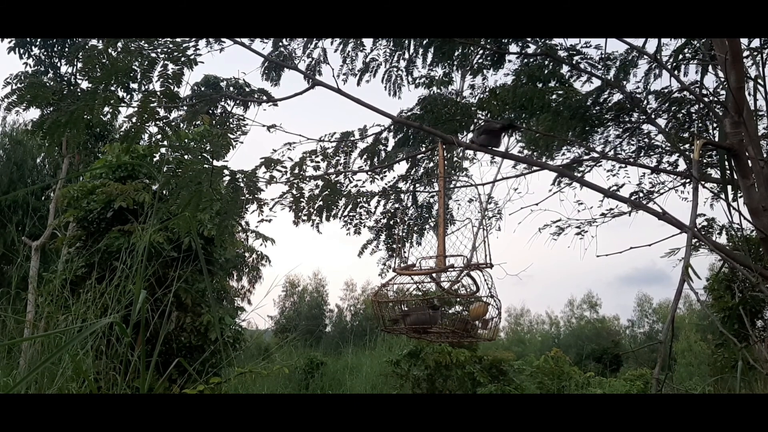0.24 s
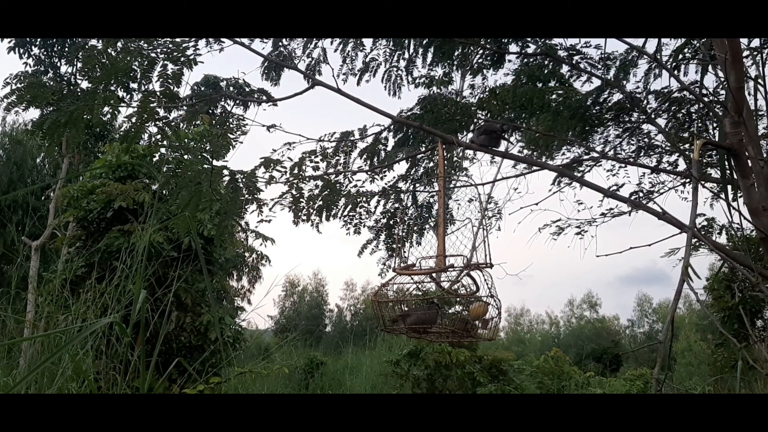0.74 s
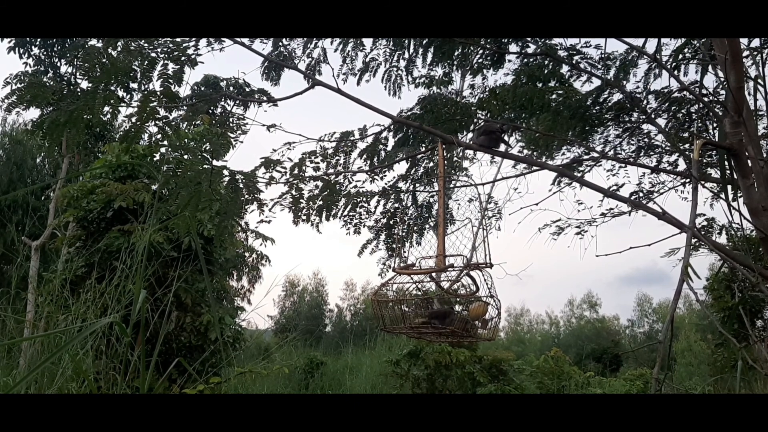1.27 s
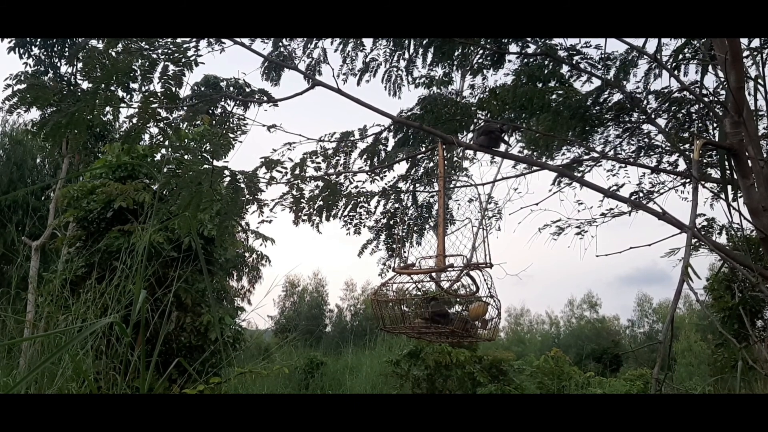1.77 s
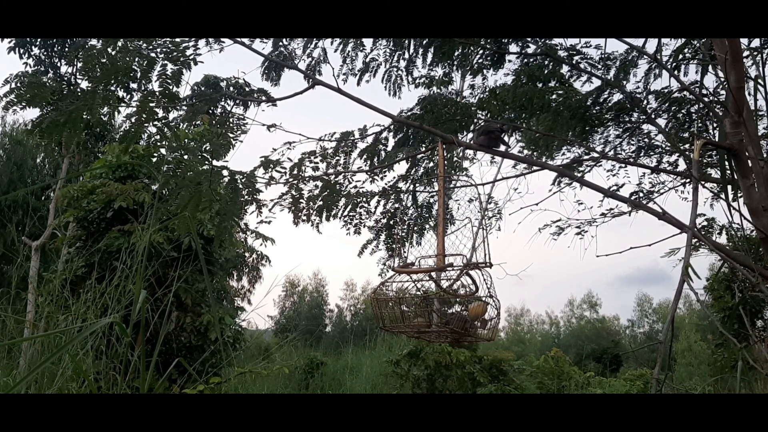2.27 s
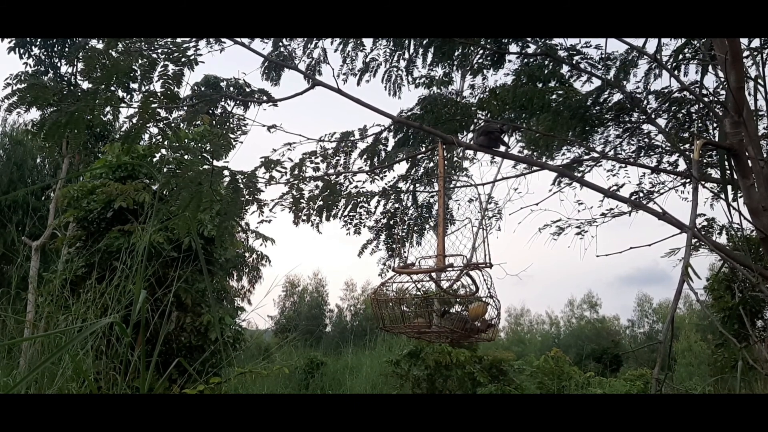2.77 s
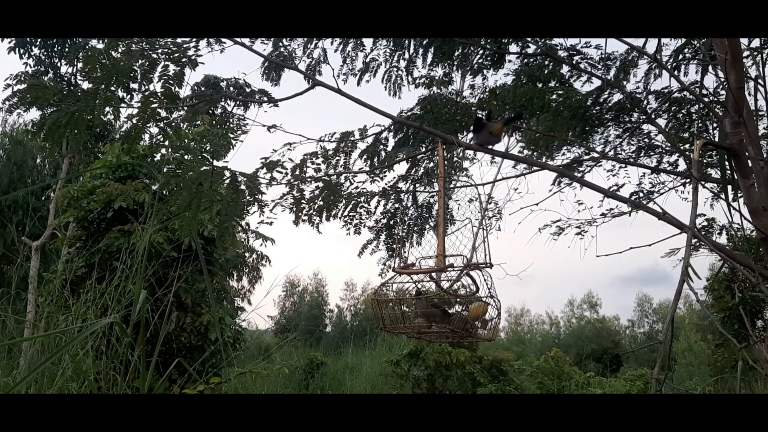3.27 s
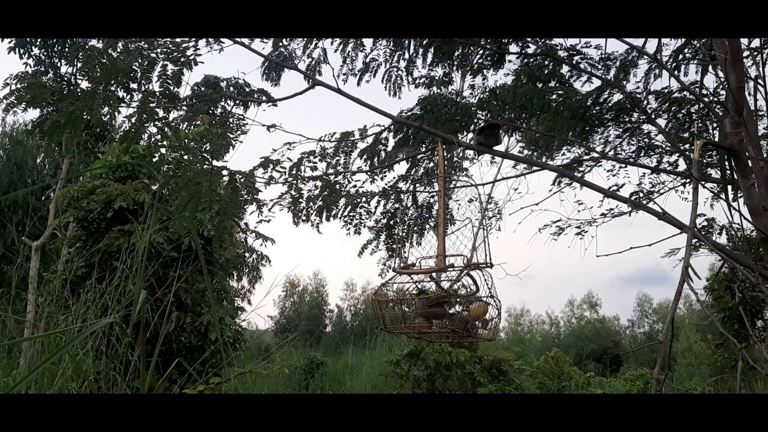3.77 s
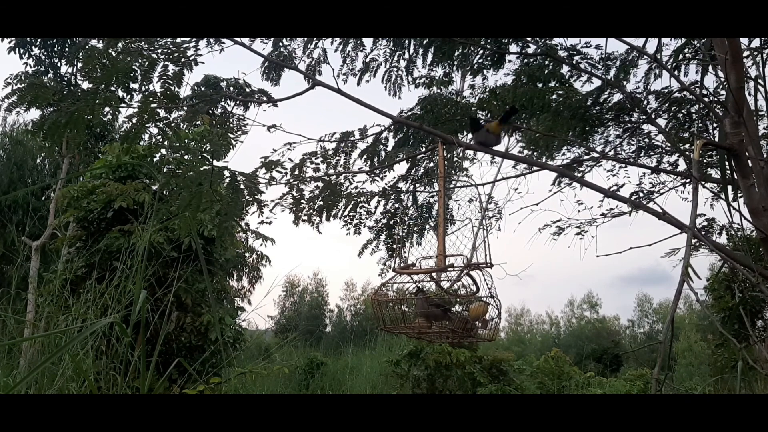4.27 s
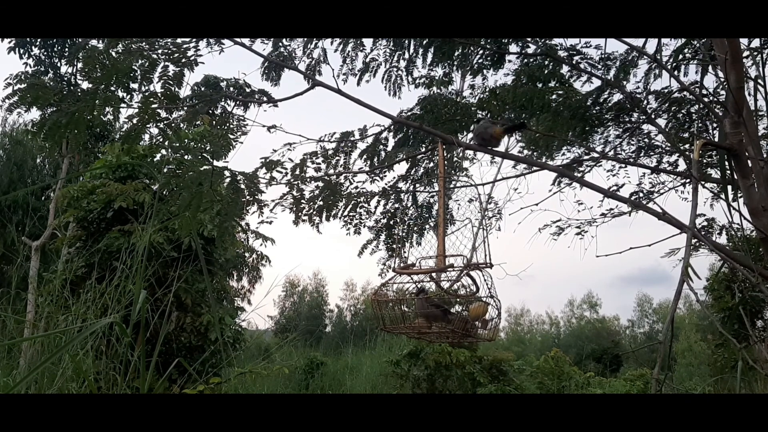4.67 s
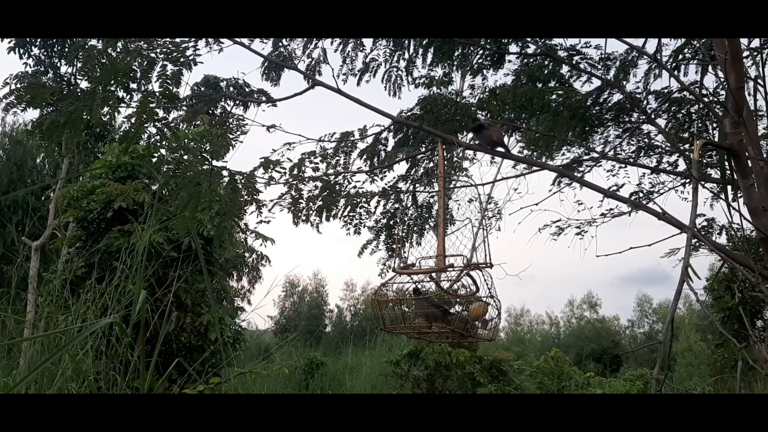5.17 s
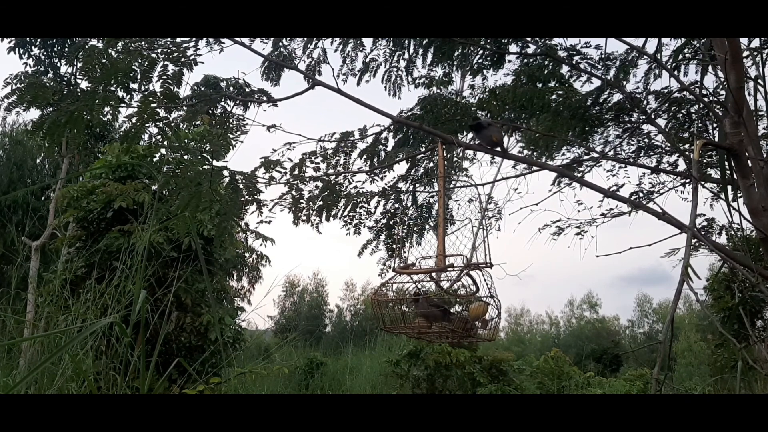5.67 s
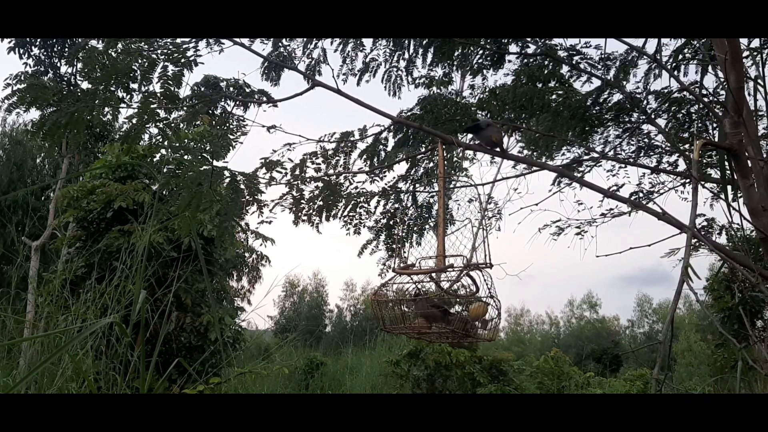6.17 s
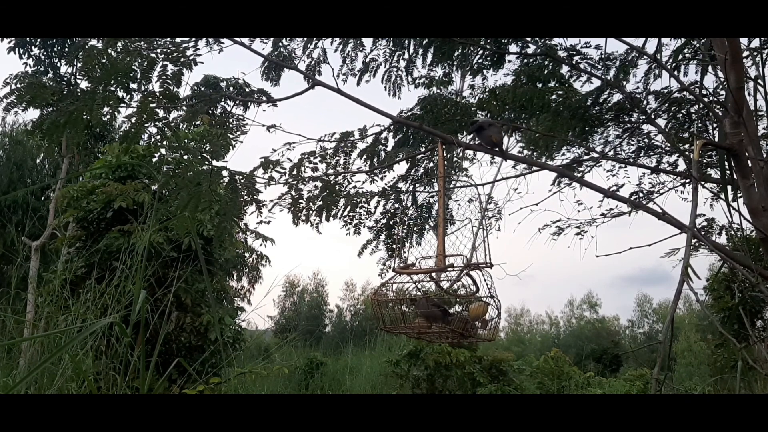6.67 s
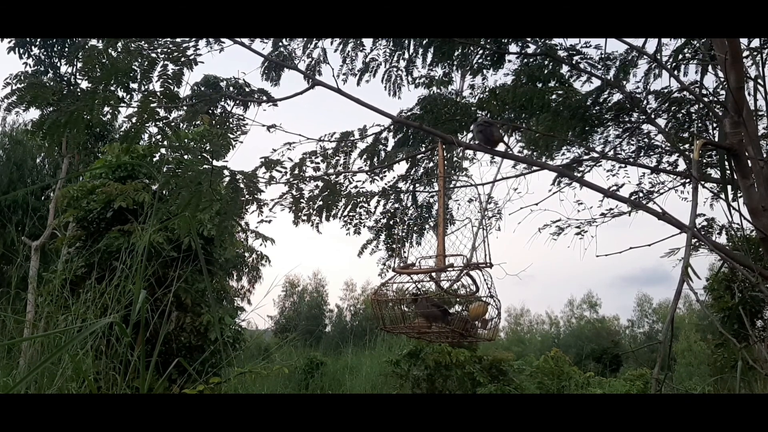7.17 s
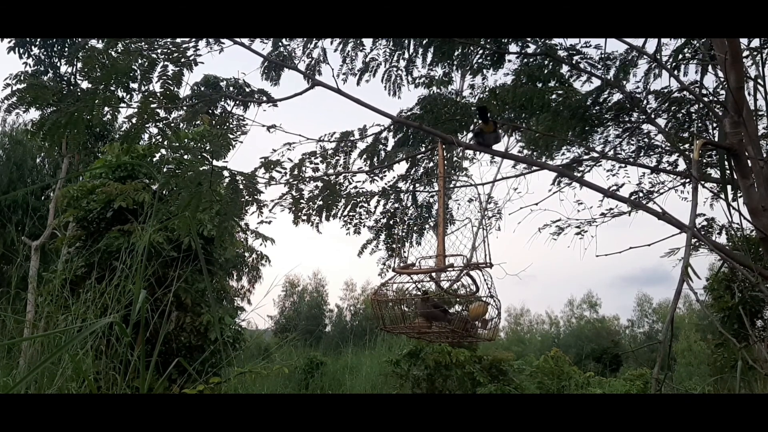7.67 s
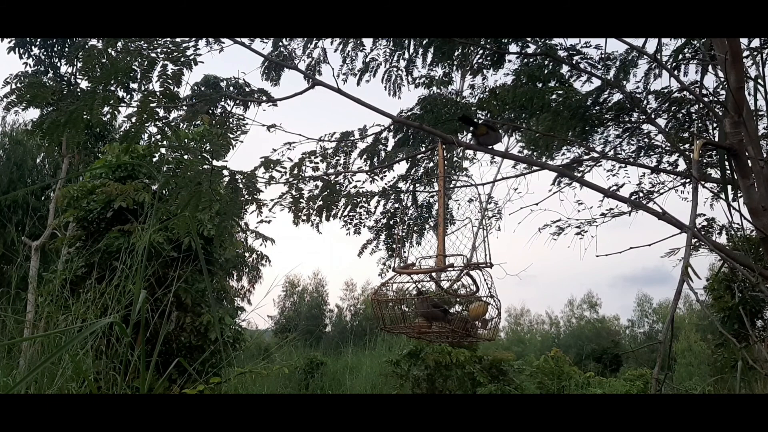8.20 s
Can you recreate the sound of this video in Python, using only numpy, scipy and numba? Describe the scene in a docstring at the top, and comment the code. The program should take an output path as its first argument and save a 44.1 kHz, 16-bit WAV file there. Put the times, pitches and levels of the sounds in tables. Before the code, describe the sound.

A small bird scolds throughout in short, harsh, rasping notes, about six a second, slightly to the right. A second bird flutters its wings in soft rustling bursts and now and then answers with a lower, hoarse note. From about halfway, a distant cow lows very faintly three times. The place is a quiet field with faint hiss and low rumble, and trees return a thin echo.

```python
"""A faint rumble and hiss fill a field, heard by a microphone with a left and a right opening.
From the start a small bird on the right scolds, about six notes a second; a fast, wide warble makes
them rasp. A second bird beats its wings in rustling bursts and now and then answers, lower.
From four seconds on, a far cow lows three times, its mouth shaping the hum of its voice.
The scolding goes on to the end, and all along the trees send back a thin echo."""
import sys
import numpy as np
from scipy import signal
from scipy.fft import rfft, irfft, next_fast_len
from scipy.io import wavfile
from scipy.ndimage import uniform_filter1d, map_coordinates
from numba import njit

SR = 44100
rng = np.random.default_rng(int(sys.argv[2]) if len(sys.argv) > 2 else 0)


def wav_record(signal):
    """Record a signal, one row per channel, as 16-bit PCM in the file named by sys.argv[1]."""
    frames = np.transpose(np.atleast_2d(signal))
    bounded = np.clip(frames, -1, 1)
    # unit amplitude maps onto the largest positive 16-bit level
    quanta = np.round(bounded * 32767).astype(np.int16)
    wavfile.write(sys.argv[1], SR, quanta)


N = 372204


def undb(db):
    """Turn decibels into a factor to multiply by."""
    return 10 ** (np.asarray(db) / 20)


def level(x, db):
    """Scale a sound to an average (RMS) level of db."""
    return x * undb(db) / np.sqrt(np.mean(x ** 2))


def colour(x, points):
    """Shape the tone along a curve of (frequency_hz, gain_db) points."""
    hz, db = np.transpose(points)
    size = next_fast_len(N + SR)
    bin_hz = np.maximum(np.arange(size // 2 + 1) * SR / size, 1)
    gain = undb(np.interp(np.log(bin_hz), np.log(hz), db))
    return irfft(rfft(x, size) * gain, size)[..., :N]


@njit
def resonate(x, hz, width_hz):
    """Let through one band of sound around a moving centre frequency."""
    out, band_state, low_state = np.empty(len(x)), 0., 0.
    for i in range(len(x)):
        tuning, damping = np.tan(np.pi * hz[i] / SR), width_hz / hz[i]
        band = (band_state + tuning * (x[i] - low_state)) / (1 + tuning * (tuning + damping))
        band_state = 2 * band - band_state
        low_state += 2 * tuning * band
        out[i] = damping * band
    return out


def wander(per_s, size=N):
    """A smooth random curve, roughly between -1 and 1, with per_s new values a second."""
    hold = max(int(SR / per_s), 1)
    steps = np.repeat(rng.standard_normal(size // hold + 1), hold)
    return 1.334 * uniform_filter1d(uniform_filter1d(steps, hold), hold)[:size]


def microphone(x, pan_db, lag_samples=14):
    """Sound from the right reaches the left opening late; a negative pan_db favours the right."""
    # The left opening favours the treble: frequency_hz, gain_db
    left_tone = [(5000, -1.5), (7000, -1), (10000, 2), (12000, 0)]
    sway = 0.49 * wander(9.8)  # the animals shift about, so the lag wanders
    late = map_coordinates(x, [np.arange(N) - lag_samples - sway], mode="nearest")
    return np.array([colour(late, left_tone) * undb(pan_db / 2), x * undb(-pan_db / 2)])


def field():
    """Faint hiss, different on each side, over a gusting rumble that both sides mostly share."""
    # Tone of the hiss: frequency_hz, gain_db
    hiss_tone = [(15, -28), (25, -21), (110, -8), (254, -14), (324, -17.5), (707, -18.5), (1120, -19.5),
                 (2510, -29), (4420, -10), (6990, -15), (7790, -12.5), (8680, -75), (10200, -16),
                 (11700, -21.5), (15700, -9.5)]
    # Rise and fall of the rumble: time_s, relative_level_db
    rumble_levels = [(0.0, -83), (0.09, -82), (2.7, -84.5), (5.81, -71.5), (5.97, -85), (7.05, -81),
                     (7.08, -72.5), (8.3, -82), (8.44, -81)]
    # Tone of the rumble: frequency_hz, gain_db
    rumble_tone = [(20, -44), (45, 1.5), (70, 6), (110, 2.5), (160, -14.5), (300, -70)]
    hiss = level(colour(rng.standard_normal((2, N)), hiss_tone), -62)
    bass_filter = signal.butter(2, 260, fs=SR, output="sos")
    blend = 0.13 * (hiss[::-1] - hiss) + 0.58 * hiss.mean(axis=0)
    hiss += signal.sosfilt(bass_filter, blend)  # the two sides are more alike in the bass
    rumble = colour(rng.standard_normal(N) + 0.23 * rng.standard_normal((2, N)), rumble_tone)
    time_s, db = np.transpose(rumble_levels)
    gust_db = np.interp(np.arange(N) / SR, time_s, db) + 4.5 * wander(6)
    return hiss + level(rumble, 1.5) * undb(gust_db)


def tree_echo(x, near_fade_s=.12, far_fade_s=.48):
    """Echoes from near twigs die fast; those from far trees are thinner and last longer."""
    # Tone of the far trees' echo: frequency_hz, gain_db
    far_tone = [(1000, -8), (2500, -10), (3900, -8), (4650, -2), (5400, -7), (8000, -11), (15000, -10)]
    t = np.arange(SR) / SR
    near_tail = undb(-32 - 60 * t / near_fade_s) * rng.standard_normal((2, SR))
    far_tail = undb(-47 - 60 * t / far_fade_s) * rng.standard_normal((2, SR))
    near = signal.fftconvolve(x[None], near_tail, axes=1)
    far = signal.fftconvolve(colour(x, far_tone)[None], far_tail, axes=1)
    return (near + far)[:, :N]


def cow():
    """Each moo is a deep chest tone plus overtones and breath shaped by the mouth."""
    # One list of points for each moo: time_s, pitch_hz, relative_level_db
    moos = [
        [(4.62, 96.14, -77.5), (4.79, 155, -69.5), (4.91, 146.7, -72.5), (5.06, 152.8, -68.5),
         (5.42, 138.2, -73.5), (5.53, 145.4, -67), (5.7, 143.3, -71.5), (5.83, 161.8, -66.5), (5.88, 159, -83)],
        [(4.03, 97, -70), (4.13, 115.3, -69.5), (4.25, 111.8, -82)],
        [(7.08, 79, -78), (7.23, 119.8, -66.5), (7.3, 132, -72), (7.42, 127, -84)],
    ]
    # Tone of the mouth: frequency_hz, gain_db
    mouth_tone = [(300, -23), (450, -45), (600, -12), (730, -3.5), (880, 5), (1050, -10), (1250, -3),
                  (1600, -42)]
    # How strongly the mouth sounds in each moo: gain_db
    mouth_gains = [1, -12.5, -7]
    out, t = np.zeros(N), np.arange(N) / SR
    mouth_hz, mouth_db = np.transpose(mouth_tone)
    breath = level(colour(rng.standard_normal(N), [(100, -40)] + mouth_tone), -6)
    for moo, open_db in zip(moos, mouth_gains):
        time_s, hz, db = np.transpose(moo)
        fade = np.clip(np.minimum(t - time_s[0], time_s[-1] - t) / 0.026, 0, 1)
        pitch_hz = np.interp(t, time_s, hz) * (1 + .009 * wander(35))
        phase = 2 * np.pi * np.cumsum(pitch_hz) / SR
        overtones = np.zeros(N)
        for k in range(2, 11):
            overtone_db = np.interp(k * pitch_hz, mouth_hz, mouth_db) + 3.8 * wander(25)
            overtones += undb(overtone_db) * np.sin(k * phase + k * k)
        chest = undb(1.54 * wander(22)) * np.sin(phase)
        loudness = np.sqrt(2) * fade * undb(np.interp(t, time_s, db))
        out += loudness * (chest + undb(open_db) * (overtones + breath))
    return out


def air_noise():
    """Noise for the wings: partly from the right, partly different on each side."""
    return microphone(rng.standard_normal(N), pan_db=-2.6) + 0.86 * rng.standard_normal((2, N))


def wing_beats(strokes_per_s=23.5, rise_s=.015, fall_s=.021):
    """Each stroke is a puff of rustling feathers over a lower whoosh of air."""
    # Bursts of beats: first_stroke_s, last_stroke_s, relative_level_db, whoosh_offset_db
    bursts = [(.013, .064, -51.5, -24), (0.167, .168, -48, -33), (.391, .582, -49.5, -23),
              (0.937, 1.1, -48.5, -21), (2.192, 2.409, -51, -22.5), (3.155, 3.312, -54, -20),
              (3.567, 3.734, -49.5, -17.5), (4.056, 4.131, -48, -20.5), (4.28, 4.351, -50.5, -41.5),
              (4.945, 5.088, -52.5, -14.5), (5.353, 5.643, -50.5, -16.5), (5.981, 6.107, -54, -20),
              (6.566, 6.731, -53, -19.5), (7.015, 7.166, -52.5, -19.5), (7.388, 7.519, -51.5, -20.5),
              (8.006, 8.153, -51, -19), (8.417, 8.417, -52, -25.5)]
    # Tone of the feathers: frequency_hz, gain_db
    rustle_tone = [(900, -34), (1250, -3.5), (1500, 2), (1800, -0.5), (2200, -8), (3050, -8), (4330, -27),
                   (7600, -28), (8300, -61)]
    # Tone of the pushed air: frequency_hz, gain_db
    whoosh_tone = [(400, -29.5), (600, -13), (800, -1), (1100, 4.5), (1400, -4), (2000, -78)]
    t, rustle_gain, whoosh_gain = np.arange(N) / SR, np.zeros(N), np.zeros(N)
    for first_s, last_s, burst_db, whoosh_db in bursts:
        strokes = np.linspace(first_s, last_s, round((last_s - first_s) * strokes_per_s) + 1)
        for at_s, scatter_db in zip(strokes, 3 * rng.standard_normal(12)):
            # the first and last strokes tend to be weaker
            db = burst_db - 5.5 * (at_s == first_s) - 1.5 * (at_s == last_s > first_s) + scatter_db
            span = slice(max(int((at_s - .05) * SR), 0), int((at_s + .08) * SR))
            from_peak_s = t[span] - at_s
            puff = np.exp(-(from_peak_s / np.where(from_peak_s < 0, rise_s, fall_s)) ** 2)
            rustle_gain[span] += undb(db) * puff
            whoosh_gain[span] += undb(db + whoosh_db) * puff
    rustle = level(colour(air_noise() * undb(2.9 * wander(300)), rustle_tone), 0.98)
    whoosh = level(colour(air_noise(), whoosh_tone), 7.1)
    return rustle_gain * rustle + whoosh_gain * whoosh


def rasp(notes, tone, pitch_hz, warble_depth, breath_db, chest_db, throat_db, climb_hz):
    """Bird notes that scoop up and warble fast; the throat's ring climbs as the beak opens."""
    # The highest part of the voice: frequency_hz, gain_db
    treble_tone = [(8800, -51), (9500, -30.5), (10300, -28), (11000, -15.5), (11900, -16.5), (12600, -30),
                   (13400, -35), (14200, -27), (15200, -26)]
    warble_hz, throat_width_hz = 112, 700.
    source, throat_hz, treble_gain = np.zeros(N), np.full(N, 4500.), np.ones(N)
    for start_s, length_s, db, ring_hz in notes:
        i, n = int((start_s - .009) * SR), int((length_s + 0.026) * SR)  # room to fade in and out
        t = np.arange(n) / SR
        progress = t / length_s
        warble_rate = warble_hz * (1 + .05 * rng.standard_normal() + 0.0796 * wander(90.83, n))
        cycles = np.cumsum(warble_rate) / SR + rng.random()
        warble = 1 - 2 * np.abs(np.sin(np.pi * cycles)) ** 1.3  # sharp tops, rounder dips
        scoop = 0.0796 * (progress - .5) - .14 * np.exp(-t / .018)
        centre_hz = pitch_hz * (1 + .03 * rng.standard_normal() + scoop)
        hz = centre_hz * np.exp(warble_depth * warble + 0.04436 * wander(700, n))
        phase = 2 * np.pi * np.cumsum(hz) / SR
        overtones = sum(np.cos(k * phase + k * k) * (k * hz < .45 * SR) for k in range(2, 11))
        chest = undb(chest_db) * np.cos(phase)
        voice = (chest + overtones) * undb(2.02 * wander(450, n) + 3 * warble)
        breath = undb(breath_db) * rng.standard_normal(n)
        fade_in = np.clip((t - .004) / 0.016, 0, 1) ** 0.5
        swell = undb(10.4 * (np.minimum(progress / 0.57, 1) - 1))
        fade_out = np.clip((t[-1] - t) / 0.023, 0, 1) ** 2
        source[i:i + n] += (undb(db) * fade_in * swell * fade_out * (voice + breath))[:N - i]
        throat_hz[i:i + n] = (ring_hz + climb_hz * (np.minimum(progress, 1.1) - .85))[:N - i]
        # the opening beak lets the treble out late in the note
        treble_gain[i:i + n] = undb(4.5 * (np.minimum(progress, 1) - 1))[:N - i]
    ring = undb(throat_db) * resonate(source, throat_hz, throat_width_hz)
    return colour(source + ring, tone) + colour(source * treble_gain, treble_tone)


def answering_bird():
    """A few lower, breathier notes with a narrow warble."""
    # The answers: start_s, length_s, relative_level_db, throat_ring_hz
    notes = [(.228, 0.068, -48.5, 3830), (.365, 0.053, -44, 4180), (1.9, 0.074, -50.5, 3700),
             (3.545, 0.0343, -46, 3380), (7.6, .056, -38.5, 3350), (7.7, 0.062, -42, 3500)]
    # Tone of the hoarse voice: frequency_hz, gain_db
    tone = [(900, -35), (1250, 0), (1600, -11), (2400, -1.5), (3300, -12.5), (4800, -2.5), (6500, -16.5),
            (7700, -18), (8300, -62)]
    return undb(-1) * rasp(notes, tone, pitch_hz=1650, warble_depth=.1,
                           breath_db=0, chest_db=7, throat_db=12, climb_hz=350)


def scolding_bird():
    """A long run of notes, made harsh by a wide warble."""
    # The scolding: start_s, length_s, relative_level_db, throat_ring_hz
    notes = [(.059, 0.065, -29.5, 4800), (.262, 0.069, -29.5, 4630), (.41, 0.0829, -26.5, 4760),
             (.572, 0.078, -27, 4930), (.726, .072, -29, 4950), (.935, 0.073, -30, 4710),
             (1.096, 0.071, -28.5, 4620), (1.33, 0.067, -31.5, 4470), (1.616, 0.057, -33, 4360),
             (1.751, 0.065, -32, 4450), (1.94, 0.07, -30, 4720), (2.061, 0.074, -28.5, 5000),
             (2.246, 0.07, -29.5, 4700), (2.394, 0.076, -30, 4760), (2.592, 0.071, -31.5, 4650),
             (2.75, .07, -31, 4653), (2.894, 0.079, -31, 4780), (3.057, 0.072, -30.5, 4900),
             (3.235, .069, -31, 4680), (3.362, .075, -28, 4950), (3.654, 0.066, -30, 4700),
             (3.785, .07, -29, 4850), (3.964, 0.07, -30.5, 4860), (4.127, 0.065, -28.5, 4790),
             (4.259, .081, -29, 4900), (4.515, 0.067, -30.5, 5015), (4.664, 0.069, -30.5, 5095),
             (4.805, 0.0711, -29.5, 5080), (4.975, 0.063, -29, 4900), (5.141, .069, -29, 4950),
             (5.487, .059, -32, 4760), (5.612, .06, -30.5, 4650), (5.772, 0.06, -31, 4900),
             (5.984, .059, -32.5, 4870), (6.112, 0.066, -31, 4970), (6.378, .06, -33, 4720),
             (6.509, 0.06, -32.5, 4850), (6.68, 0.065, -30, 5000), (6.814, .064, -30, 5200),
             (7.011, 0.076, -31.5, 5060), (7.234, 0.062, -32, 4960), (7.362, 0.065, -30.5, 4800),
             (7.517, 0.077, -29, 4930), (7.765, 0.07, -28, 5040), (7.912, 0.076, -27, 5050),
             (8.085, 0.074, -28.5, 4900), (8.263, .072, -28.5, 4930)]
    # Tone of the voice apart from the throat's ring: frequency_hz, gain_db
    tone = [(900, -33.5), (1300, -27.5), (1500, -10.5), (1750, -14), (2100, -12), (2600, -17.5), (3300, -7),
            (4800, -7.5), (6000, -9.5), (7100, -19.5), (7700, -21.5), (8300, -76)]
    return undb(-1.5) * rasp(notes, tone, pitch_hz=1800, warble_depth=.3,
                             breath_db=-6, chest_db=-0.5, throat_db=10.5, climb_hz=807)


def scene():
    """Add up the animals, their echo and the field, left and right."""
    scolds, answers, wings, moos = scolding_bird(), answering_bird(), wing_beats(), cow()
    birds = microphone(scolds, pan_db=-1.47) + microphone(answers, pan_db=-0.93) + wings
    far_cow = microphone(moos, pan_db=-0.61)
    echo = tree_echo(scolds + answers + wings[1] + undb(1) * moos)
    return birds + far_cow + echo + field()


def record(dry, top_hz=15750):
    """The recorder cuts off the highest treble."""
    return signal.sosfilt(signal.ellip(10, .2, 80, top_hz, fs=SR, output="sos"), dry)


dry = scene()
out = record(dry)
wav_record(out)
```